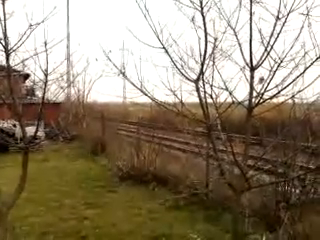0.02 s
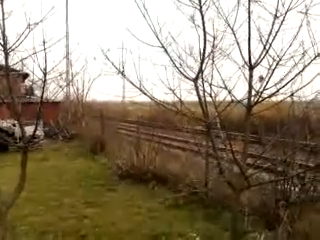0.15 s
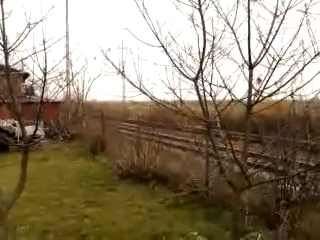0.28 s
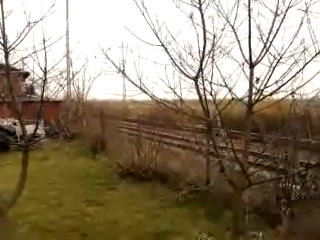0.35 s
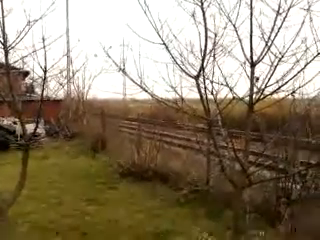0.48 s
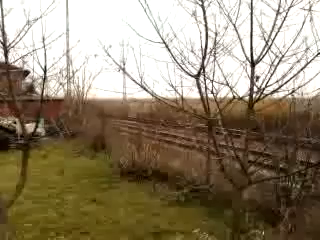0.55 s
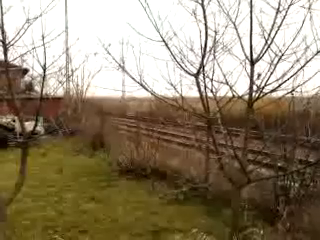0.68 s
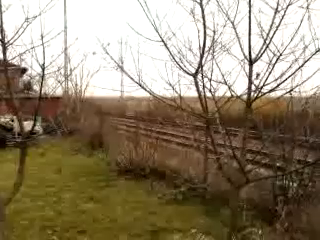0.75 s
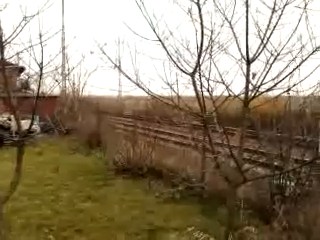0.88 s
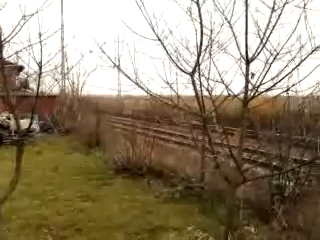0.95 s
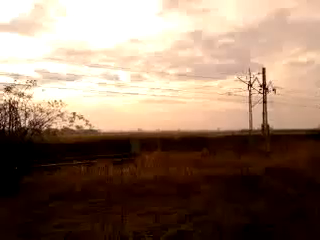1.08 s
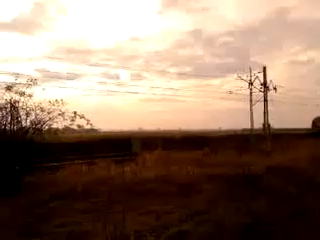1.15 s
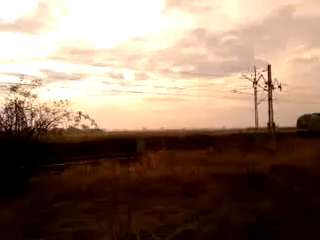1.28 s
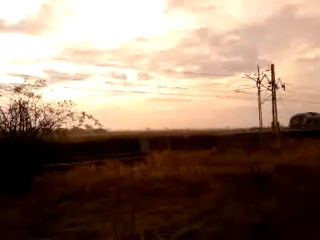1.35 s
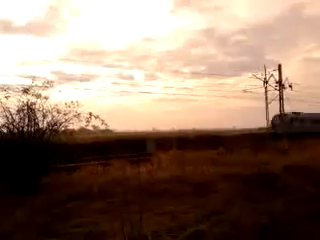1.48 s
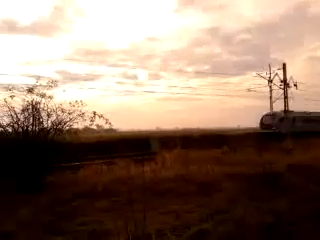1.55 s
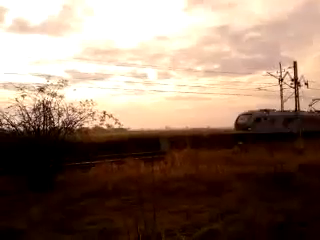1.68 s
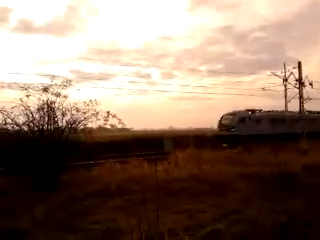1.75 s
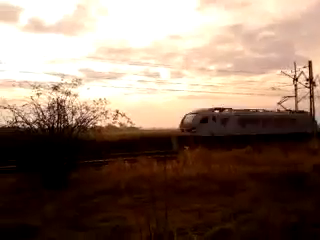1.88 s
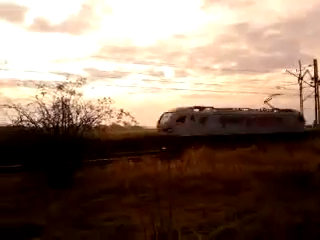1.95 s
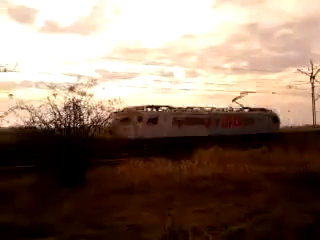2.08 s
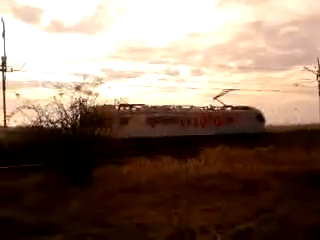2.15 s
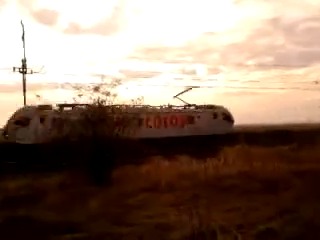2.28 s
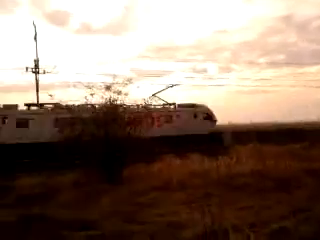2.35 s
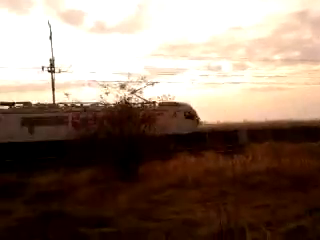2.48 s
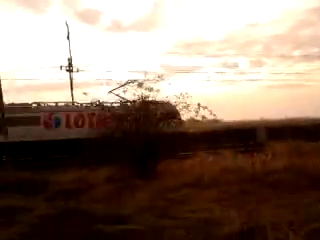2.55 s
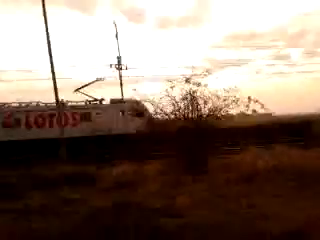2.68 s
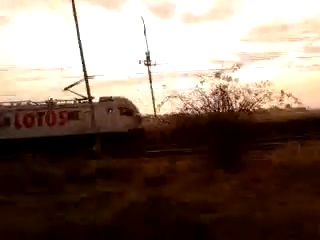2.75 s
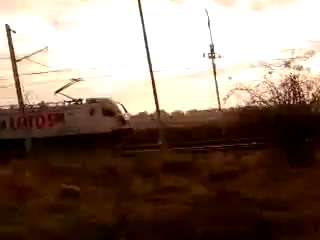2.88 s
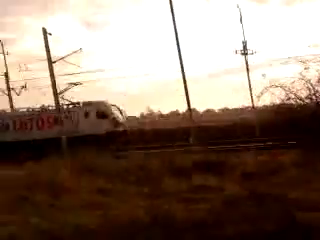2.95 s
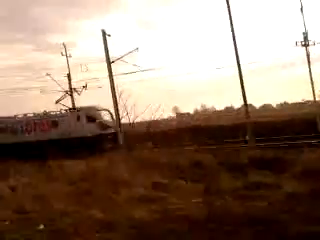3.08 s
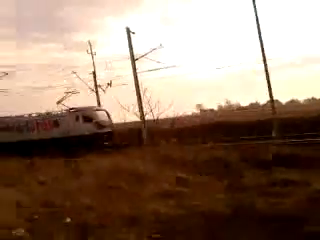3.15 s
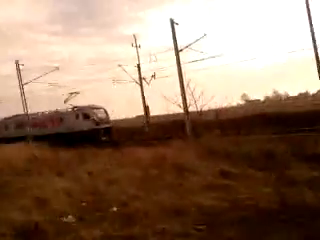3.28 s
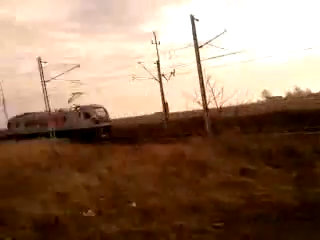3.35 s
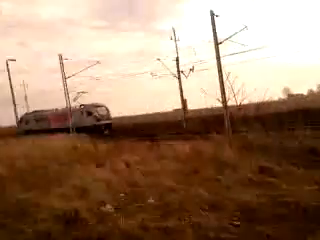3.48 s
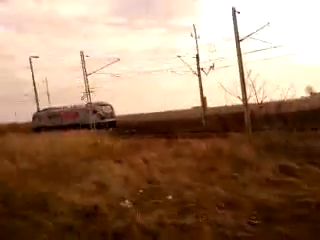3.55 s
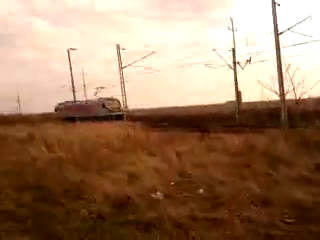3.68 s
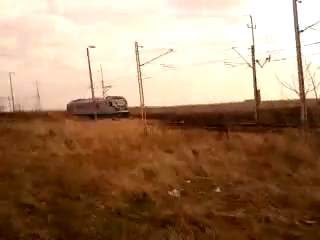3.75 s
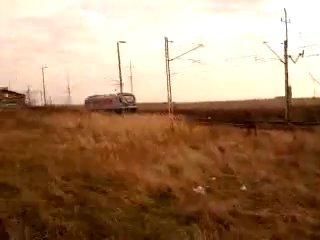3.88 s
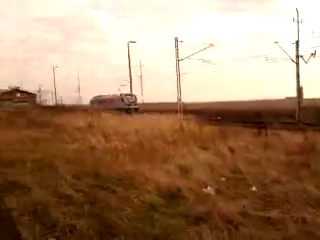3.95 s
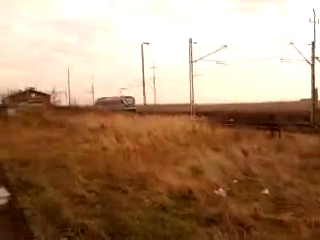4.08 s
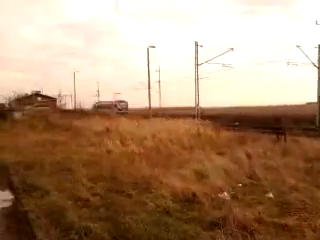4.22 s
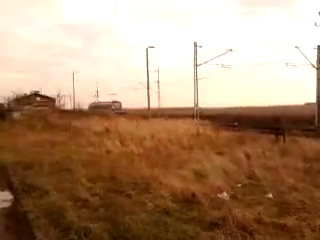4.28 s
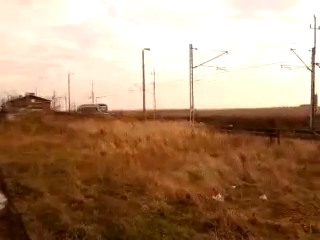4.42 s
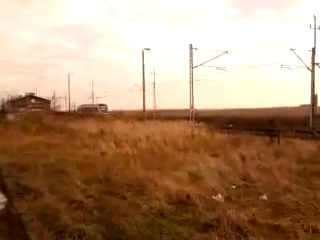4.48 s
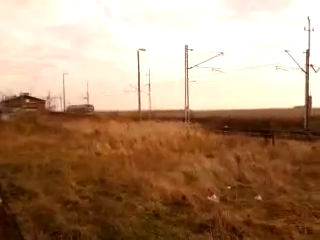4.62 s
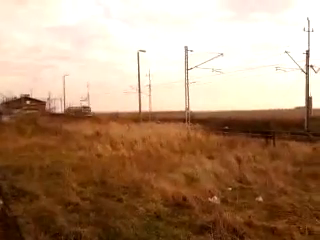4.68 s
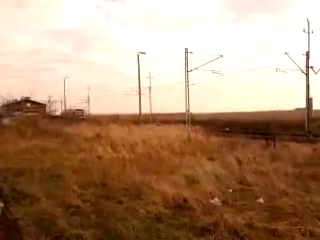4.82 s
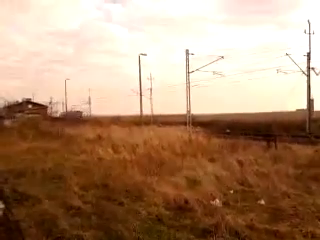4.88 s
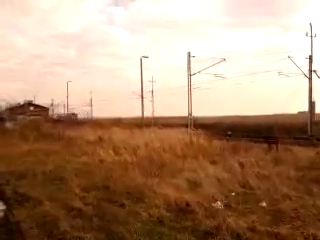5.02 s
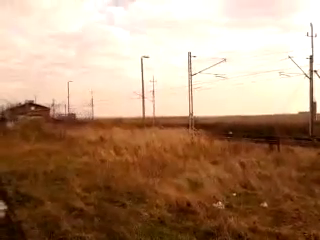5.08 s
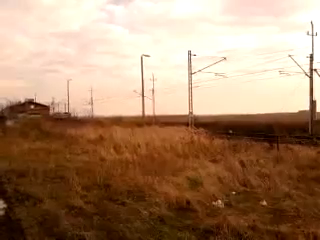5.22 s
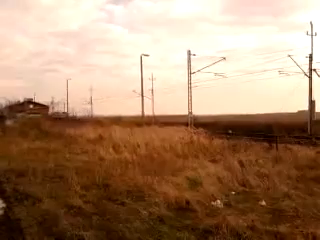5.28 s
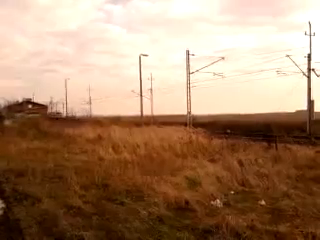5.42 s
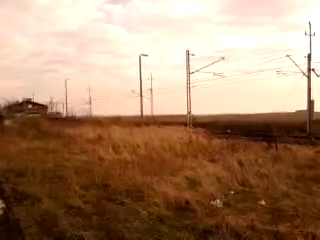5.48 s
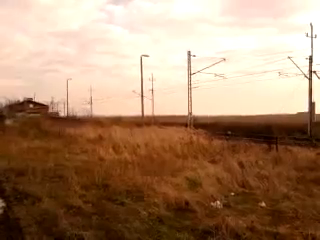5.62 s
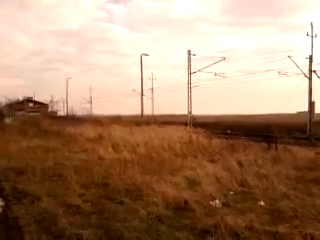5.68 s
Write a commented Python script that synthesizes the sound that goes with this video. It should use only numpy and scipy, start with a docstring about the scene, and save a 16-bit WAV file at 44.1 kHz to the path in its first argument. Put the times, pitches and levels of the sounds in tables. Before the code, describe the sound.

From 0 to about 1.1 s, wind hits a small, cheap outdoor microphone: faint at first, then from about 0.2 s irregular bursts of low, fluttering thumps, some raspy and crackling, squashed and clipped, with brief lulls. At 1.09 s the sound snaps off mid-swing, leaving a gap of about 0.04 s. A quiet field fades in, and a lone electric locomotive approaches, rolling hiss, roar and low rumble growing steeply from 1.7 s. It is loudest around 2.3-3.2 s: a noisy, metallic singing of wheels and rail around 1.5 kHz, sliding down in pitch as it passes at about 2.7 s. From 3.3 s it falls away unevenly, fluttering, with a soft wind bump near 3.6 s and a faint steady low hum clearest around 3.6-4 s. By 5 s almost nothing remains, except a small wind puff at 5.5 s. Close, dry, open air, muffled treble.

```python
"""Wind gusts and a passing locomotive

Wind buffets a small microphone in a field; after a cut, a lone electric locomotive runs past.
Wheels and rail sing as resonances whose pitch drops by the Doppler effect, over shaped noise for
rolling hiss, roar and a rumble that also holds wind, and a sine for the converter hum.
Each puff of wind is a few rough cycles. A limiter, a narrow band and a hard ceiling shape the sound;
the cut leaves a short gap and a fade-in."""
import sys
import numpy as np
from scipy import signal
from scipy.io import wavfile
from scipy.ndimage import uniform_filter1d, minimum_filter1d

SR = 44100
rng = np.random.default_rng(int(sys.argv[2]) if len(sys.argv) > 2 else 0)


def dump_mix(stems):
    """Bounce the given channels to the path in sys.argv[1] as a 16-bit WAV at rate SR."""
    frames = np.atleast_2d(stems).T  # one column per channel
    limited = np.clip(frames, -1, 1)  # hard clip at full scale
    pcm = np.round(limited * 32767).astype(np.int16)
    wavfile.write(sys.argv[1], SR, pcm)


N = 253462
CUT_S = 1.0878  # the wind scene ends about here, the train scene follows

# time abreast in s, time to cover the closest distance in s, speed over the speed of sound
CLOSEST_S, SWEEP_S, MACH = 2.72, 0.55, 0.115
# slow level changes of the singing: rms dB when abreast, and more per second away
FLUTTER_DB, FLUTTER_DB_PER_S = 1.18, 0.87
# how a layer follows the rolling level: (dB over it, share of its changes, dB added behind and taken ahead)
UPPER_FOLLOWS = (-1.1, 1, -1.3)

# singing of wheel and rail: t/s, level/dB
SINGING_LEVEL = [(1.15, -38), (1.31, -28.5), (1.7, -26), (2.36, -9.5), (2.75, -8.5), (3.14, -7.5),
                 (3.3, -14), (3.38, -11.5), (3.55, -17), (3.63, -14), (4.2, -33), (4.23, -25),
                 (4.36, -29.5), (4.46, -27.5), (4.52, -31.5), (4.96, -39), (5.01, -49), (5.75, -68)]
# wheel resonances at rest: f/Hz, width of each smoothing pole/Hz, relative level/dB
WHEEL_RESONANCES = [(1390, 41, -3.5), (1416, 75, -8), (1531, 190, -4.5), (1723, 410, -6), (1335, 180, -8.5)]
# centre of the upper band, which moves with the path over the ground: t/s, f/Hz
UPPER_CENTRE = [(1.2, 2000), (1.8, 2145), (2.5, 2171), (3.3, 1936), (5.1, 2164)]


def singing():
    """Resonance and Doppler effect: rail roughness drives wheel modes that slide together in pitch."""
    doppler = 1 / (1 + MACH * passing())
    wheel = np.zeros(N)
    for hz, width, db in WHEEL_RESONANCES:
        wheel += gain_of(db) * band(hz * doppler, width) * flutter(2.85, length=1300)
    # air eddies on the path shake the singing more as the path grows
    shake_db = FLUTTER_DB + FLUTTER_DB_PER_S * abs(np.arange(N) / SR - CLOSEST_S)
    wheel_level = flutter(shake_db, length=700) * gain_of(curves(SINGING_LEVEL)[0])
    upper = band(curves(UPPER_CENTRE)[0], 300) * flutter(2.6, length=1200)
    return wheel_level * evened(wheel) + follow(*UPPER_FOLLOWS) * upper


HISS_FOLLOWS, ROAR_FOLLOWS = (-2.5, 1.05, 2.5), (0.17, 1, -0.77)
FIELD_ROAR_DB = -59.5  # what remains in the field once the locomotive is gone

# spectrum of the rolling hiss: f/Hz, relative spectral level/dB
HISS_SPECTRUM = [(1900, -30.5), (2400, -6.5), (2900, -1), (3300, -7), (3600, -16.5), (4400, -30.5),
                 (5000, -34.5)]
# spectrum of the rolling roar: f/Hz, relative spectral level/dB
ROAR_SPECTRUM = [(350, -21.5), (520, -7), (800, 0.5), (1100, 0.5), (1600, 0.5), (2200, -23.5), (2700, -38)]
# spectrum of the rumble: f/Hz, relative spectral level/dB
RUMBLE_SPECTRUM = [(20, -30), (60, -12.5), (130, -8), (200, 0), (400, 0.5), (600, -23.5), (900, -37.5)]
# approach and departure, with a gust in the rumble near 3.6 s:
# t/s, reference rolling level/dB, rumble level/dB
ROLLING_LEVELS = [(1.2, -37, -48.5), (1.65, -27.5, -39), (2.07, -22, -26.5), (2.26, -16.5, -28.5),
                  (2.66, -19.5, -35), (2.9, -20.5, -35.5), (3.38, -29, -38), (3.52, -34.5, -43),
                  (3.58, -34, -34.5), (4.35, -47.5, -49.5), (5.11, -53, -53.5), (5.75, -73, -57)]


def rolling():
    """Broadband noise: wheels, bogies and ballast give hiss and roar; the rumble also holds wind."""
    hiss = follow(*HISS_FOLLOWS) * noise(HISS_SPECTRUM, patchy_db=2.0, flicker_db=2.5)
    # powers of independent sounds add
    roar_gain = np.hypot(follow(*ROAR_FOLLOWS), gain_of(FIELD_ROAR_DB))
    roar = roar_gain * noise(ROAR_SPECTRUM, patchy_db=1.0, flicker_db=3.0)
    rumble_gain = gain_of(curves(ROLLING_LEVELS)[1])
    rumble = rumble_gain * noise(RUMBLE_SPECTRUM, patchy_db=4.0, flicker_db=0.0)
    return hiss + roar + rumble


def follow(over_db, share, behind_db):
    """Level superposition: offset, rolling level and a lean to front or rear add in decibels."""
    return gain_of(over_db + share * curves(ROLLING_LEVELS)[0] + behind_db * passing())


HUM_HZ = 290

# converter hum heard behind the locomotive: t/s, level/dB
HUM_LEVEL = [(3.1, -48.5), (3.5, -43), (3.62, -39), (4.03, -40.5), (4.1, -66.5), (4.44, -51), (4.6, -62.5),
             (5.7, -59)]


def hum():
    """Pure tone: the converter holds one frequency, slightly unsteady in level, after the pass."""
    t = np.arange(N) / SR
    rise = np.clip((t - HUM_LEVEL[0][0]) / 0.17, 0, 1)
    tone = np.sqrt(2) * np.sin(2 * np.pi * HUM_HZ * t)
    return rise * gain_of(curves(HUM_LEVEL)[0]) * flutter(2.5, length=3000) * tone


# strong puffs: t/s, level of the swing/dB, mean f/Hz, time scale/ms, rasp setting/dB
STRONG_PUFFS = [(0.007, -22, 338, 11, -27), (0.178, -10, 400, 11, -31), (0.263, -8, 403, 1.5, -23),
                (0.289, -0.5, 441.3, 7.9, -16), (0.303, -14.5, 308.5, 12, -27),
                (0.326, -5.5, 347.7, 12.7, 4.5), (0.342, -7, 300.2, 12, -11), (0.452, -6, 291.6, 12.6, -32),
                (0.479, -2, 626.4, 17.3, -1), (0.493, -12, 388, 12, -42), (0.508, -5, 625, 7.2, -20),
                (0.52, -19, 398, 7.9, -46), (0.533, -17, 387, 7, -38), (0.562, -4, 382.5, 4.8, -36),
                (0.572, -7, 285, 3.8, -38), (0.678, -1, 463, 11.3, -12), (0.706, -13, 521, 11.4, -21),
                (0.729, -13.5, 372, 16, -39), (0.793, -13.5, 302.6, 11, -17.5), (0.812, -9.5, 208, 36, -34),
                (0.887, -2.5, 294, 11, -8), (0.903, -2.5, 306.7, 3.8, -25),
                (0.933, -10.5, 347, 16.5, -11.5), (0.948, -11, 466, 7.6, -9), (0.96, -7, 530, 7.7, 8),
                (0.981, -2, 662.6, 14, -17), (1.012, -5, 262.4, 16, -14), (1.032, -1, 437.6, 8.7, -9),
                (1.064, -3.5, 376.6, 25, -13.5), (1.081, -12, 407.3, 21, -20.5),
                (3.585, -23.5, 299, 23, -23.5), (3.88, -21, 161, 17, -37), (5.488, -37, 274, 25, -33),
                (5.519, -19, 538, 8.8, -42), (5.522, -7, 248, 10.2, -39), (5.541, -28, 224, 4.1, -29)]
# spectrum of the rasp on a puff: f/Hz, relative spectral level/dB
RASP_SPECTRUM = [(290, -42), (500, 2.5), (1400, 5.5), (1580, -21), (1820, -23.5), (2180, -22),
                 (3490, -26.5), (4340, -45.5), (5640, -74), (9550, -120)]
# broad body of a puff: f/Hz, relative spectral level/dB
THUD_SPECTRUM = [(100, -27), (200, 13.5), (500, 1.5), (900, -20), (1300, -42.5)]
# treble of a puff: f/Hz, relative spectral level/dB
FIZZ_SPECTRUM = [(1200, -25), (1700, 12.5), (3000, 0.5), (3600, 2), (4700, -21), (5200, -50.5)]
# steady wind between the puffs: t/s, level/dB
BREEZE_LEVEL = [(0.0, -30), (0.95, -36.5), (1.08, -39)]
# spectrum of the steady wind: f/Hz, relative spectral level/dB
BREEZE_SPECTRUM = [(24, -66), (40, -43), (200, 4.5), (565, -11), (773, -3.5), (1040, -21), (1250, -31),
                   (1660, -25), (2270, -29.5), (3110, -30), (4340, -59.5), (5640, -107), (9550, -120)]


def wind():
    """Turbulent pressure: each eddy swings the membrane a few rough cycles, with a weak after-swing."""
    out = gain_of(curves(BREEZE_LEVEL)[0]) * noise(BREEZE_SPECTRUM, patchy_db=4.5, flicker_db=1.5)
    out[round(CUT_S * SR):] = 0
    rasp = noise(RASP_SPECTRUM, patchy_db=4.5, flicker_db=9.0)
    thud = noise(THUD_SPECTRUM, patchy_db=3.5, flicker_db=1.5)
    fizz = noise(FIZZ_SPECTRUM, patchy_db=2.5, flicker_db=6.0)
    t = np.arange(-1500, 3000) / SR
    puffs = faint_puffs() + STRONG_PUFFS
    chance = rng.standard_normal((len(puffs), len(t)))
    for (s, db, hz, ms, rasp_db), jitter in zip(puffs, chance):
        # quicker to rise than to fall
        main = np.exp(-np.where(t < 0, 7.0, 2.6) * (t / (ms / 1000)) ** 2)
        after = 0.37 * (1 - np.exp(-np.maximum(t, 0) / 0.0023)) ** 2 * np.exp(-t / 0.01)
        shape = main + after
        wobble = evened(uniform_filter1d(uniform_filter1d(jitter, size=70), size=70))
        turns = np.cumsum(hz * (1 + 0.2048 * wobble)) / SR + jitter[0]
        swing = np.sin(2 * np.pi * turns) + 0.13 * np.sin(4 * np.pi * turns + jitter[1])
        at = round(s * SR) + np.round(t * SR).astype(int)
        inside = (at >= 0) & (at < N)
        spot = at[inside]
        rough = gain_of(0.23 * rasp_db - 4.0) * thud[spot]
        rough += gain_of(rasp_db + 4.0) * rasp[spot]
        rough += gain_of(0.58 * rasp_db - 26.0) * fizz[spot]
        out[spot] += gain_of(db) * shape[inside] * (swing[inside] + rough)
    return signal.sosfilt(signal.butter(4, 135, "highpass", fs=SR, output="sos"), out)


# faint puffs: mean level and spread in dB, median swing in Hz, time scale in ms, rasp setting in dB
FAINT_COUNT = 14
FAINT_DB, FAINT_SPREAD_DB, FAINT_HZ, FAINT_MS, FAINT_RASP_DB = -35.5, 7.5, 303, 6.1, -5.5


def faint_puffs():
    """Random arrivals: weak eddies fall evenly by chance before the cut, as rows like the strong ones."""
    when = rng.uniform(0, CUT_S, FAINT_COUNT)
    size, pitch = rng.standard_normal((FAINT_COUNT, 2)).T
    level_db = FAINT_DB + FAINT_SPREAD_DB * size
    swing_hz = FAINT_HZ * np.exp(0.18 * pitch)
    return [(s, db, hz, FAINT_MS, FAINT_RASP_DB) for s, db, hz in zip(when, level_db, swing_hz)]


def passing():
    """Line-of-sight geometry: -1 coming straight on, 0 abreast, 1 going straight away."""
    along = (np.arange(N) / SR - CLOSEST_S) / SWEEP_S
    return along / np.sqrt(1 + along ** 2)


def flutter(db, length):
    """Random amplitude modulation: smoothed level changes of db rms, length in samples."""
    drift = uniform_filter1d(uniform_filter1d(rng.standard_normal(N), length), length)
    return gain_of(db * evened(drift))


def band(hz, width):
    """Narrow-band noise: a doubly smoothed random swing carried on the moving frequency hz."""
    r = np.exp(-np.pi * width / SR)
    swing = rng.standard_normal(N) + 1j * rng.standard_normal(N)
    for _ in range(2):
        swing = signal.lfilter([1], [1, -r], swing)
    carrier = np.exp(2j * np.pi * np.cumsum(hz) / SR)
    return evened((swing * carrier).real)


def noise(spectrum, patchy_db, flicker_db):
    """Short-time spectral synthesis: random spectra with drifting patches and a flicker of all bands."""
    frames, hz = N // 128 + 5, np.fft.rfftfreq(512, 1 / SR)
    a, b, patches = rng.standard_normal((frames, 257, 3)).T
    patches = uniform_filter1d(patches, size=4, axis=0)  # across frequency
    patches = evened(uniform_filter1d(patches, size=16, axis=1))  # across time
    flicker = evened(uniform_filter1d(rng.standard_normal(frames), size=6))
    f, db = np.transpose(spectrum)
    shape_db = np.interp(np.log(hz + 1), np.log(f), db, left=-80, right=-120)
    level_db = shape_db[:, None] + patchy_db * patches + flicker_db * flicker
    z = (a + 1j * b) * gain_of(level_db)
    return evened(signal.istft(z, nperseg=512, noverlap=384)[1][:N])


def curves(rows):
    """Linear interpolation: every column after the time becomes a curve over all samples."""
    s, *columns = np.transpose(rows)
    return [np.interp(np.arange(N) / SR, s, c) for c in columns]


def gain_of(db):
    """Decibel law: 20 dB is a factor of ten in amplitude."""
    return 10 ** (np.asarray(db) / 20)


def evened(x):
    """Normalization: scales the signal to a root mean square of one."""
    return x / np.sqrt(np.mean(x ** 2) + 1e-20)


def scene():
    """Superposition: pressures add, with puffs of wind on both sides of the cut and the train only after."""
    after_cut = np.arange(N) >= CUT_S * SR
    train = singing() + rolling() + hum()
    return (wind() + after_cut * train)[None]


LOW_CUT_HZ, NARROW_HZ, EDGE_HZ = 21, 4980, 15870
LIMIT_FROM, LIMIT_SHARE, FULL_SCALE = 0.86, 0.62, 0.965  # onset, exponent of the excess, hard ceiling
CUT_SWING = 0.44  # the cut falls in mid-swing, near this amplitude, and snaps
SILENCE_S, FADE_IN_S = 0.043, 0.018
SELF_NOISE_DB = -97.5  # white noise, before the last band limit


def record(dry):
    """Nonlinear transmission: limiter, narrow band, hard overload, cut with gap and fade-in, band limit."""
    soft = signal.sosfilt(signal.butter(2, LOW_CUT_HZ, "highpass", fs=SR, output="sos"), dry)
    # the limiter follows the crests within about a millisecond
    peaks = -minimum_filter1d(-abs(soft), size=60)
    reduction = np.maximum(peaks / LIMIT_FROM, 1) ** LIMIT_SHARE
    soft = soft / uniform_filter1d(reduction, size=90)
    narrow_filter = signal.firwin(401, NARROW_HZ, window=("kaiser", 9), fs=SR)[None]
    narrow = signal.oaconvolve(soft, narrow_filter, "same")
    # of the last 100 samples, the one closest to the wanted swing becomes the cut
    last = np.arange(round(CUT_S * SR) - 100, round(CUT_S * SR))
    snap = last[np.argmin(abs(abs(narrow[0, last]) - CUT_SWING))]
    since = (np.arange(N) - snap) / SR
    edit = np.where(since < 0, 1, np.clip((since - SILENCE_S) / FADE_IN_S, 0, 1))
    clipped = np.clip(narrow, -FULL_SCALE, FULL_SCALE) * edit
    noisy = clipped + gain_of(SELF_NOISE_DB) * rng.standard_normal(dry.shape)
    edge_filter = signal.firwin(511, EDGE_HZ, window=("kaiser", 9), fs=SR)[None]
    return signal.oaconvolve(noisy, edge_filter, "same")


dry = scene()
out = record(dry)
dump_mix(out)
```